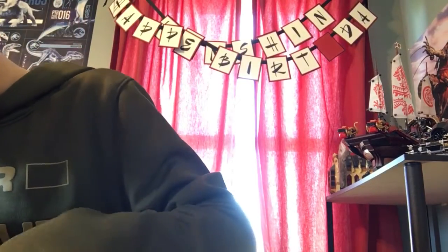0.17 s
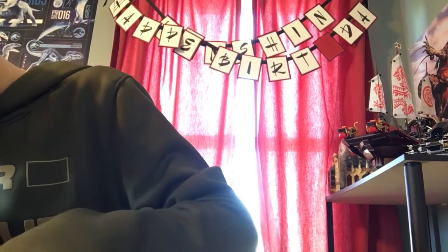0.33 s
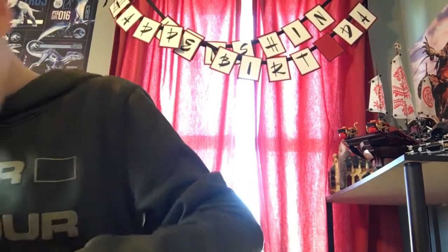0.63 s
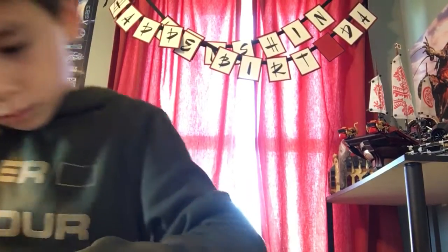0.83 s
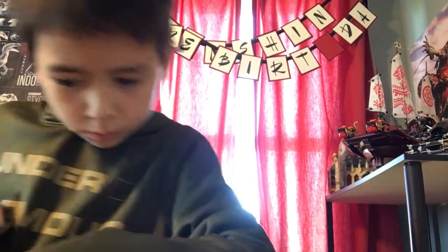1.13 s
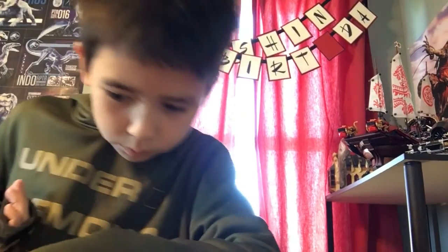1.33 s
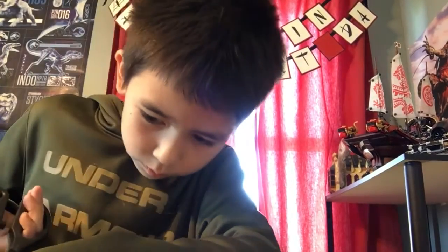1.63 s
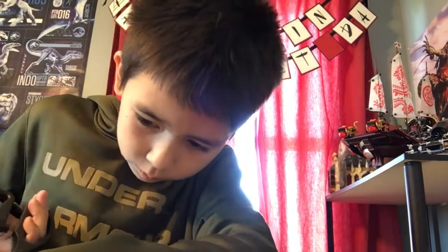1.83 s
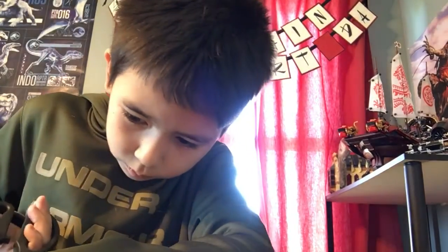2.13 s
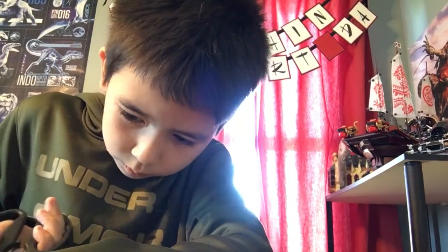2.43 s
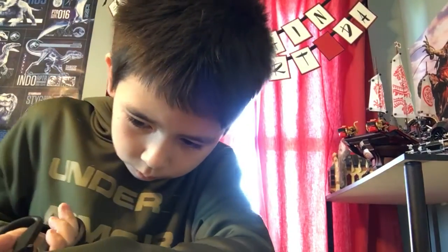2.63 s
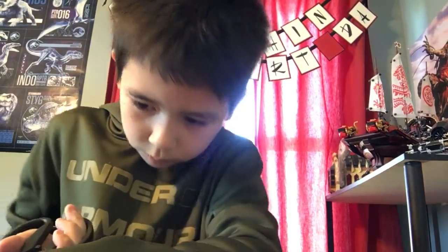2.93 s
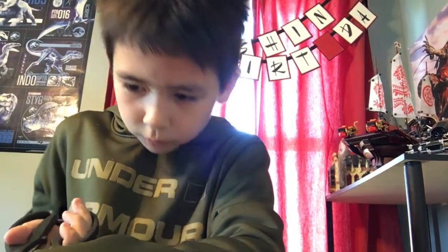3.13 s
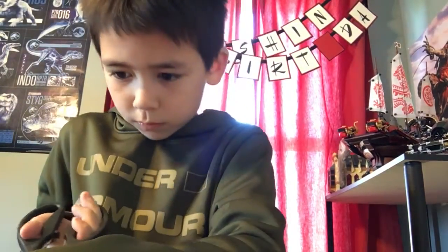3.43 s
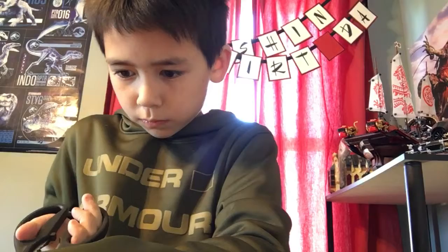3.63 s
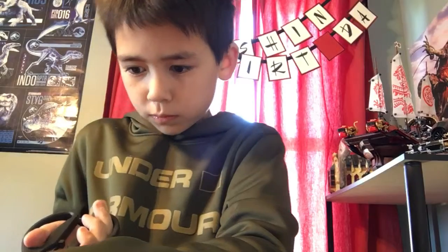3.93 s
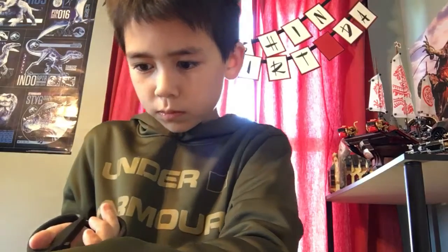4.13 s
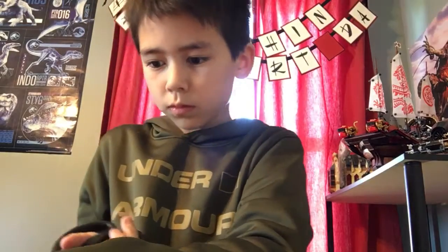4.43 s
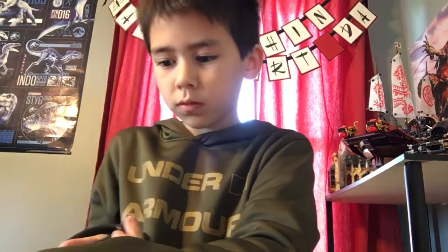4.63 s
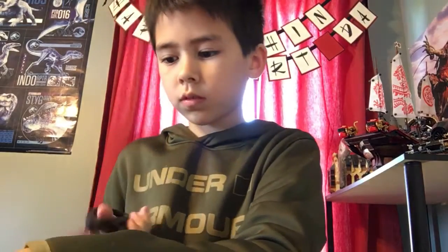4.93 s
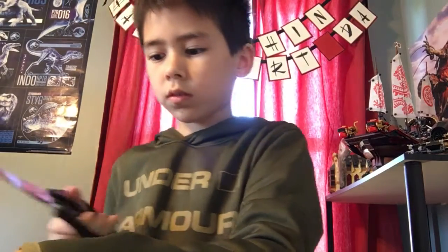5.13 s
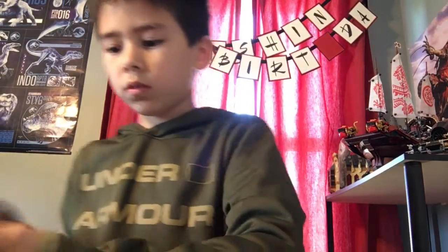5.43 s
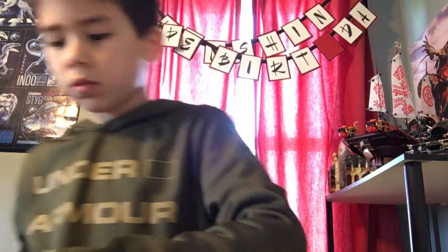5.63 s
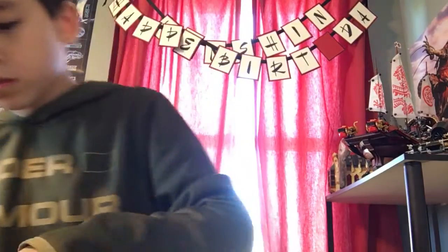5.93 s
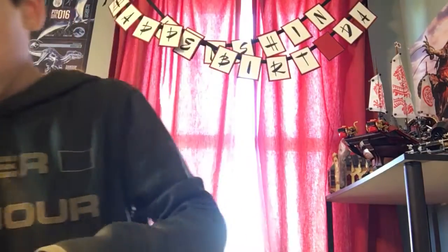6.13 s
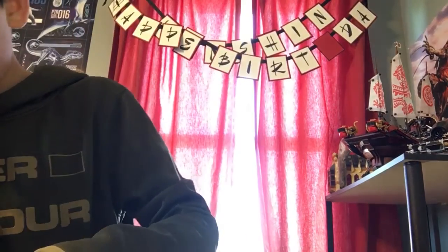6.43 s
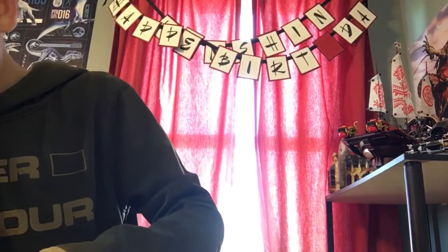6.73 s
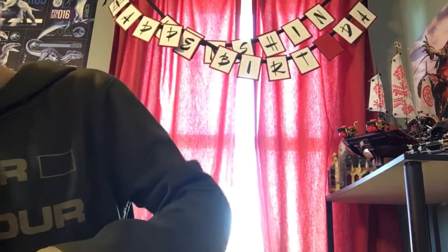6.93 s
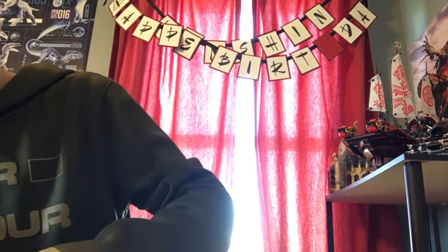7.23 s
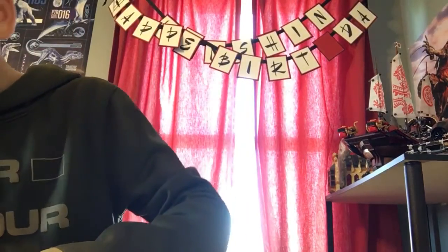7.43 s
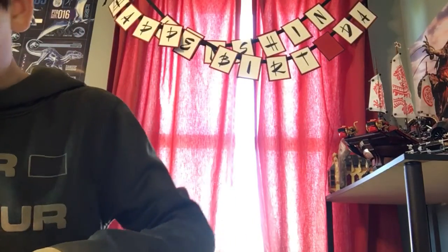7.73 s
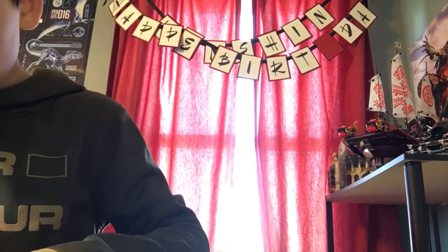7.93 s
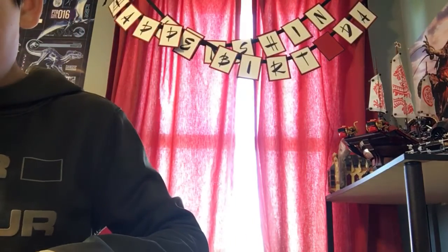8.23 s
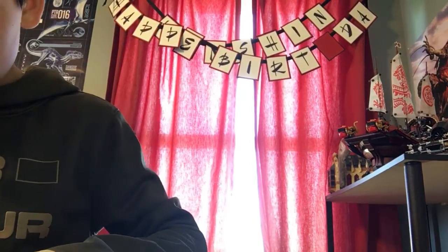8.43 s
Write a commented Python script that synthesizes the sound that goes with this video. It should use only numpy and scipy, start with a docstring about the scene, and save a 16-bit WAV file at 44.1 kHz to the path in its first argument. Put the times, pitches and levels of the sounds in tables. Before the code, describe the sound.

Close, dry plastic clicking and snipping in a quiet furnished room, broken by two loud clacks, a sharp crumple, then creaky twisting.

```python
"""Small hands cut and twist stiff plastic toy packaging on a desk, close by in a furnished room.
Over a quiet hush of shaped noise, a rustle of tiny noise grains opens; snips and clacks ring the plastic shell.
Soft desk bumps join in, and two hard clacks stand out near 2.8 and 4.6 s; after the second the shell crumples
strongly, in showers of buckles. From about 6 s twisted parts creak in stick-slip bursts, which return near
the end. The room answers snips, crumples and creaks with a brief tail of fading noise."""
import sys
import numpy as np
from scipy import signal
from scipy.fft import rfft, irfft, next_fast_len
from scipy.io import wavfile
from scipy.ndimage import uniform_filter1d, map_coordinates

SR = 44100
rng = np.random.default_rng(int(sys.argv[2]) if len(sys.argv) > 2 else 0)


def to_wav(sig):
    """Store sig (one row per channel, or 1-D mono) as 16-bit WAV at the path in sys.argv[1].

    Samples outside -1..1 are clipped; the rate is SR.
    """
    pcm = np.clip(np.atleast_2d(sig), -1, 1) * 32767
    pcm = np.round(pcm).astype(np.int16)
    wavfile.write(sys.argv[1], SR, pcm.T)  # frames by channels


N = 377937  # length in samples
LOW_HZ, HIGH_HZ = 1100, 3500  # thud lies below the first, edge and sheen above the second


def undb(db):
    """Turn decibels into a plain gain."""
    return 10 ** (np.asarray(db) / 20)


def unit(x):
    """Scale a sound to an average (RMS) level of 1."""
    return x / np.sqrt(np.mean(x ** 2))


def ring(x, hz, width_hz):
    """One damped resonance, gain 1 at its centre; a wider one dies sooner."""
    return signal.lfilter(*signal.iirpeak(hz, hz / width_hz, fs=SR), x)


def colour(x, points):
    """Shape a long sound by a spectrum given as (pitch_hz, level_db) points."""
    hz, db = np.transpose(points)
    size = next_fast_len(len(x))
    f = np.maximum(np.arange(size // 2 + 1) * SR / size, 1)
    gain = undb(np.interp(np.log(f), np.log(hz), db))
    return irfft(rfft(x, size) * gain, size)[:len(x)]


def split(x, lo_hz, hi_hz):
    """Keep only the band between two pitches."""
    return signal.sosfilt(signal.butter(2, [lo_hz, hi_hz], "band", fs=SR, output="sos"), x)


def decay(x, fade_ms):
    """Give every impulse a tail that fades exponentially."""
    return signal.lfilter([1], [1, -np.exp(-1000 / (fade_ms * SR))], x)


def walk(rate):
    """Random levels held 1 / rate s and slewed; spread near 1."""
    hold = int(SR / rate)
    steps = np.repeat(rng.standard_normal(N // hold + 1), hold)
    return unit(uniform_filter1d(steps, hold)[:N])


# Spectrum of the quiet house: pitch_hz, relative level_db (per Hz)
HUSH_SPECTRUM = [(20, -25.5), (45, -0.5), (75, -3), (170, -8), (265, -1), (420, -14.5), (800, -17.5),
                 (2500, -45), (16400, -54.5)]
HUSH_DB = -63.5


def hush():
    """The quiet of the house: shaped noise, wavering a little."""
    noise = unit(colour(rng.standard_normal(N), HUSH_SPECTRUM))
    return noise * undb(HUSH_DB + 0.34 * walk(4.6))


# How long the room holds each band: pitch_hz, t60_s (time to fall by 60 dB)
ROOM_FADES = [(260, 0.38), (600, 0.22), (1400, 0.21), (2900, 0.21), (9000, 0.26)]
ROOM_DB = -14.5


def room(x):
    """Many overlapping echoes blur into a tail of noise; each band fades at its own speed."""
    t = np.arange(SR // 2) / SR
    tail = 0
    for hz, t60_s in ROOM_FADES:
        band = split(rng.standard_normal(len(t)), hz / 1.35, hz * 1.44)
        tail = tail + band * np.exp(-np.log(1000) * t / t60_s)
    tail *= np.clip(t / 0.0055, 0, 1)  # the echoes build up over the first 5.5 ms
    return undb(ROOM_DB) * signal.fftconvolve(x, tail / np.sqrt(np.sum(tail ** 2)))[:N]


# Handling by sleeves and film: start_s, body_db, sheen_db (over 3.5 kHz)
RUSTLE_LEVELS = [(0., -47, -44), (0.042, -60, -67), (.18, -57, -72.5), (.77, -49.5, -59.5),
                 (.9, -60.5, -65), (2.5, -61.5, -80), (2.895, -53.5, -74.5), (3.2, -75, -76.5),
                 (3.601, -51, -69.5), (3.999, -74.5, -75.5), (4.521, -56, -76), (4.6, -38, -43.5),
                 (4.817, -38.5, -59), (4.95, -58.5, -77.5), (5.5, -48.5, -55.5), (5.721, -42.5, -54.5),
                 (5.8, -59, -74.5), (6.3, -45, -58.5), (6.41, -47, -63), (6.44, -57, -67.5),
                 (6.999, -50.5, -73.5), (7.2, -60, -74), (8.57, -64, -74)]
# Spectrum of rubbed cloth and film: pitch_hz, relative level_db (per Hz)
FILM_SPECTRUM = [(120, 3.5), (300, -7.5), (700, 1.5), (1500, -4), (2600, -7.5), (4000, -13.5),
                 (7000, -20.5), (16000, -32)]


def rustle(grains_per_s=600.0, spread_db=3.8, smear_ms=3.3, flicker_db=(3.0, 1.5)):
    """Cloth and film crackle in tiny grains of unequal size, each with a short tail; body and sheen flicker apart."""
    s, body_db, sheen_db = np.transpose(RUSTLE_LEVELS)
    t = np.arange(N) / SR
    sizes = undb(spread_db * rng.standard_normal(N))
    grains = (rng.random(N) < grains_per_s / SR) * sizes
    tails = decay(grains, smear_ms)
    glide = 0.5 * np.mean(tails)  # cloth sliding smoothly under the grains
    bands = [(120., HIGH_HZ, body_db), (HIGH_HZ, 17000., sheen_db)]
    out = 0
    for (lo, hi, db), flick_db in zip(bands, flicker_db):
        rubbing = (tails + glide) * rng.standard_normal(N)
        film = colour(rubbing * undb(flick_db * walk(30)), FILM_SPECTRUM)
        out = out + unit(split(film, lo, hi)) * undb(np.interp(t, s, db))
    return out


# An arm or the box bumps the desk: start_s, peak_db
DESK_BUMPS = [(1.594, -48), (3.049, -46.5), (3.465, -44), (4.612, -40.5), (5.365, -44), (5.587, -44.5),
              (6.283, -37), (6.943, -41.5), (7.287, -46.5)]
# Ways the desk rings: pitch_hz, width_hz, relative level_db
DESK_MODES = [(67, 8.8, 2.5), (138, 66, 5)]


def bumps(push_ms=11.7):
    """A soft push sets the desk's low modes going."""
    s, db = np.transpose(DESK_BUMPS)
    t = np.arange(SR // 4) / SR
    push = np.convolve(np.hanning(int(push_ms * SR / 1000)), t == 0)
    thump = sum(undb(mode_db) * ring(push, hz, width_hz) for hz, width_hz, mode_db in DESK_MODES)
    thump = split(thump, 57.0, 370.0)  # the deepest bass is cut away below the thump
    starts = np.zeros(N)
    starts[(s * SR).astype(int)] = undb(db)
    return signal.fftconvolve(starts, thump / np.abs(thump).max())[:N]


# The plastic changes shape as it is worked, so each mode comes and goes
BEND_DB, BENDS_PER_S = 3, 45


def bursts(table, modes, edge_db, uneven, scatter_db, grip_ms, swell_db_per_s):
    """Trains of uneven jerks, each a brief scrape, ring the modes; the valleys between these are dark."""
    jerks = np.zeros((3, N))  # what drives the low, middle and high modes
    for start, end, rate, db, thud_db in table:
        chance = rng.standard_normal((96, 2))
        gaps = np.exp(uneven * chance[:, 0] - uneven ** 2 / 2) / rate
        at = start + np.cumsum(gaps) - gaps[0]
        keep = at < min(end, (N - 1) / SR)
        at = at[keep]
        # the longer the push, the more it swells and eases
        arch = np.sin(np.pi * (at - start) / (end - start)) - 1
        effort_db = swell_db_per_s * (end - start) * arch
        size = undb(db + effort_db + scatter_db * chance[keep, 1]) / np.sqrt(rate / SR)
        jerks[:, (at * SR).astype(int)] += size * undb([[thud_db], [0], [edge_db]])
    jerks += 0.18 * rng.standard_normal(N) * decay(jerks, grip_ms)  # scrape after each jerk
    top_db = max(db for hz, _, db in modes if hz > HIGH_HZ)
    out = 0
    for k, (hz, width_hz, db) in enumerate(modes):
        band = int(hz > LOW_HZ) + int(hz > HIGH_HZ)
        drive = jerks[band] * undb(BEND_DB * walk(BENDS_PER_S))
        gain = undb(db - top_db * (hz > HIGH_HZ))
        # neighbouring modes swing in opposite sense, so they add up between their peaks
        out = out + (-1) ** k * gain * ring(ring(drive, hz, width_hz), hz, width_hz)
    return undb(11.5) * out  # narrow modes pass little of a jerk's energy


# Twisted parts creak: start_s, end_s, slips_per_s, relative level_db, thud_db (added under 1.1 kHz)
CREAK_BURSTS = [(6.145, 6.183, 270, -59.5, -2), (6.503, 6.62, 265, -53, -2.5),
                (6.695, 6.75, 290, -51.5, -7), (6.761, 6.806, 183, -54, -10), (6.853, 6.892, 105, -50, -10),
                (6.904, 6.938, 90, -49, -3), (7.6, 7.785, 300, -55.5, 3.5), (7.819, 7.85, 245, -54.5, 0),
                (7.865, 7.885, 218, -58, 5), (8.258, 8.278, 170, -57.5, 3.5), (8.304, 8.334, 127, -57.5, 4),
                (8.352, 8.374, 170, -57.5, 2), (8.381, 8.399, 145, -57, 1), (8.415, 8.429, 204, -56.5, 1.5),
                (8.477, 8.496, 170, -53.5, -1), (8.516, 8.568, 143, -56, 1.5)]
# Ways the twisted joint rings: pitch_hz, width_hz (of one resonance), relative level_db
JOINT_MODES = [(284, 110, -10), (596, 158, 6), (1000, 330, 8), (1710, 480, 8), (2490, 810, 2),
               (4330, 1330, -5.5), (6900, 1100, -21)]


def creaks():
    """Stick-slip at the joint: nearly even, crisp slips of like size."""
    return bursts(CREAK_BURSTS, JOINT_MODES, edge_db=-6.5, uneven=.12, scatter_db=2.0,
                  grip_ms=2.22, swell_db_per_s=48.5)


# The shell crumples: start_s, end_s, buckles_per_s, relative level_db, thud_db (added under 1.1 kHz)
CRUMPLE_BURSTS = [(0.216, 0.313, 570, -66, 17), (1.125, 1.181, 223, -60, 7.5),
                  (2.601, 2.68, 144, -57.5, 0.5), (4.571, 4.657, 326, -46, -3),
                  (4.705, 4.819, 360, -45, -1), (5.074, 5.11, 320, -59.5, 5), (5.15, 5.2, 193, -63, 5),
                  (5.375, 5.41, 194, -47, -2.5), (5.599, 5.639, 416, -44.5, -4.5),
                  (6.2, 6.25, 84, -52.5, 1.5), (6.069, 6.14, 110, -56.5, 3.5),
                  (6.65, 6.691, 220, -48.5, -28), (6.953, 7.05, 126, -56, 2), (7.358, 7.415, 170, -46, -7)]
# Ways the plastic shell rings, also when struck: pitch_hz, width_hz (of one resonance), relative level_db
SHELL_MODES = [(289.3, 166, 0), (600, 160, 6), (931, 276, 1.5), (1540, 455, 0.5), (2445, 474, 2),
               (3970, 910, -5.5), (5100, 1400, -11.5), (6600, 1630, -15.5), (12130, 2400, -29.5)]


def crumples():
    """Buckling of the shell: a shower with chance gaps and chance sizes."""
    return bursts(CRUMPLE_BURSTS, SHELL_MODES, edge_db=-12.5, uneven=0.64, scatter_db=4.5,
                  grip_ms=2.66, swell_db_per_s=21.0)


LEAN_DB_PER_OCT = 3.5  # a blow favours the modes near its pitch
PIECE_DB, PIECE_CYCLES = -19.5, 7  # the loose piece that is struck rings briefly at the blow's pitch
# Contact takes a moment to build: time at level 0 dB, and dB of lengthening per dB softer
RISE_MS, SOFTER = 0.17, 0.39
# Snips, clicks and clacks: start_s, level_db, brightness_db, pitch_hz
CLICK_BLOWS = [(0.117, -38.5, -10, 1540), (0.31, -30.5, -5, 1090), (0.504, -33, -13.5, 620),
               (0.536, -37, -3.5, 960), (0.575, -45, -4, 2430), (0.611, -48, -8, 1300),
               (0.689, -35, -17, 1000), (0.704, -30, -6.5, 1060), (0.73, -38, -8, 1000),
               (0.76, -27.5, -6, 643), (0.954, -45, -0.5, 870), (1.127, -21, -20, 2600),
               (1.412, -40, -39, 1530), (1.598, -24.5, -11, 2560), (1.614, -27.5, -20, 660),
               (1.689, -35, -16, 840), (1.724, -29, -7, 575), (1.827, -36.5, -16, 1420),
               (1.921, -35.5, -36, 1500), (1.988, -32, -18, 986), (2.069, -25.5, -13.5, 686),
               (2.275, -26, -16.5, 2300), (2.617, -32, -17, 663), (2.658, -25.5, -18.5, 2280),
               (2.742, -34, -16.5, 1280), (2.7987, -3.5, -21, 2490), (2.8004, -10.5, -17.5, 1513),
               (2.918, -38.5, -16, 480), (3.057, -33, -12.5, 1470), (3.302, -29, -16.5, 535),
               (3.362, -38, -7.5, 2560), (3.382, -39.5, -27, 510), (3.469, -19.5, -16.5, 1480),
               (3.546, -30.5, -12, 596), (3.568, -28, -15.5, 596), (3.585, -27.5, -25, 635),
               (3.6, -38, -24, 1490), (3.618, -38, -22, 1480), (3.635, -31.5, -19, 600),
               (3.669, -35, -41, 630), (3.684, -20, -17, 572), (3.697, -25, -15.5, 2660),
               (3.752, -32, -24, 613), (3.787, -38, -19, 888), (3.808, -28, -23, 610),
               (3.861, -26.5, -20.5, 865), (3.89, -30.5, -25, 570), (3.922, -32.5, -11.5, 1090),
               (4.035, -42, -38.5, 514), (4.092, -47.5, -41, 600), (4.165, -31, -42, 600),
               (4.219, -44.5, -40.5, 806), (4.26, -62, 6.5, 1500), (4.372, -22, -1.5, 2290),
               (4.397, -28, -27, 1700), (4.54, -35.5, -3.5, 960), (4.5588, -1, -12.5, 1590),
               (4.5621, -6.5, -7, 496), (4.601, -17, -14, 1270), (4.621, -21.5, -16, 2460),
               (4.631, -16.5, -7.5, 2480), (4.6366, -17, -16, 2440), (4.736, -20.5, -7.5, 890),
               (4.77, -24.5, -12, 2440), (4.799, -21, -8.5, 960), (5.075, -34, -22, 1510),
               (5.176, -30.5, -22, 2630), (5.272, -19.5, -13.5, 905), (5.304, -27.5, -17, 630),
               (5.367, -21, -13, 1010), (5.383, -20, -10, 2570), (5.414, -39, -25, 740),
               (5.548, -36.5, -1.5, 1280), (5.594, -22, -11.5, 660), (5.696, -32.5, -11.5, 690),
               (5.725, -26, -17, 1710), (5.848, -33.5, -27, 1890), (5.908, -29.5, -15.5, 900),
               (5.955, -26.5, -13, 890), (5.97, -31, -11, 1550), (6.06, -26, -16.5, 846),
               (6.231, -34.5, -5, 850), (6.254, -13, -12, 890), (6.272, -27, -9.5, 2300),
               (6.602, -30, -14, 2290), (6.6477, -15.5, -18.5, 1000), (6.665, -24.5, -16.5, 1000),
               (6.781, -25.5, -21, 650), (6.812, -33.5, -17, 1800), (6.839, -34, -27, 1870),
               (6.942, -14, -14, 1710), (6.949, -17.5, -33, 261), (7.298, -26, -12.5, 1630),
               (7.33, -27.5, -14.5, 1590), (7.355, -19.5, -10.5, 930), (7.467, -33, -17, 1780),
               (7.522, -32.5, -10.5, 1660), (7.901, -36.5, -19, 1800), (7.942, -35.5, -26, 1180),
               (7.982, -34, -31, 1100), (8.016, -35.5, -21, 1040), (8.038, -36, -36, 1070),
               (8.07, -14.5, -17.5, 764), (8.152, -36.5, -27, 1040), (8.18, -37, -25, 1000),
               (8.24, -29, -32, 1090), (8.469, -33.5, -16, 1270)]
# Thud, body, snap and edge of a blow: level_db (added to the blow's), gain in dB per dB of brightness
BLOW_PARTS = [(-7, 0.07), (-2, 0.0843), (2, 0.22), (5.5, 1.32)]
# Borders of those four parts: pitch_hz
PART_EDGES_HZ = (230, 700, 1700, 3500, 18000)
# How long those four parts last: fade_ms
PART_FADE_MS = (18, 10.4, 5, 3.3)


def clicks(scatter_db=3.0, rattle=0.29, blow_ms=4.9, harder=0.45, flex=0.048):
    """Each blow, a hard tick plus a short rattle of contact, shares among the shell's modes by where it lands."""
    s, db, bright_db, pitch_hz = np.transpose(CLICK_BLOWS)
    t = np.arange(2048) / SR

    def lean_db(hz):
        """Weaken what lies far from the blow's pitch."""
        return -LEAN_DB_PER_OCT * np.abs(np.log2(np.clip(hz, 500, 2500) / pitch_hz))

    fade_ms = (blow_ms * undb(-harder * db))[:, None]  # a harder blow is a shorter one
    blow = rattle * rng.standard_normal((len(s), len(t))) * np.exp(-1000 * t / fade_ms)
    blow[:, 0] += 1.6  # the hard tick
    shell = 0
    for k, (hz, width_hz, mode_db) in enumerate(SHELL_MODES):
        share_db = mode_db + lean_db(hz) + scatter_db * rng.standard_normal(len(s))
        shell = shell + (-1) ** k * undb(share_db)[:, None] * ring(blow, hz, width_hz)
    # the grip flexes the shell, so all its modes shift a little from blow to blow
    read = np.arange(len(t)) * np.exp(flex * rng.standard_normal((len(s), 1)))
    shell = map_coordinates(shell, [np.arange(len(s))[:, None] + 0 * read, read])
    turns = pitch_hz[:, None] * t
    shell += undb(PIECE_DB) * np.sin(2 * np.pi * turns) * np.exp(-turns / PIECE_CYCLES)
    rise = 1 - np.exp(-1000 * t / (RISE_MS * undb(-SOFTER * db))[:, None])
    sound = 0
    for lo, hi, (rel_db, slope), ms in zip(PART_EDGES_HZ, PART_EDGES_HZ[1:], BLOW_PARTS, PART_FADE_MS):
        part = split(split(shell, lo, hi), lo, hi) * np.exp(-1000 * t / ms) * rise
        part_lean_db = lean_db(np.sqrt(lo * hi)) * (lo < HIGH_HZ)  # the edge does not lean
        part_db = db + rel_db + slope * bright_db + part_lean_db
        sound = sound + part * (undb(part_db) / np.abs(part).max(axis=1))[:, None]
    out = np.zeros(N + len(t))
    for at, row in zip((s * SR).astype(int), sound):
        out[at:at + len(t)] += row
    return out[:N]


def scene():
    """Add the plastic sounds, the room's answer to them, and the softer layers."""
    near = clicks() + creaks() + crumples()
    return (near + room(near) + bumps() + rustle() + hush())[None]


def record(dry):
    """Peaks near full scale are rounded and the top is cut steeply."""
    rounded = dry / (1 + dry ** 4) ** .25
    top_cut = signal.ellip(10, .2, 60, 16300, fs=SR, output="sos")  # cut above 16300 Hz
    return signal.sosfilt(top_cut, rounded)


dry = scene()
out = record(dry)
to_wav(out)
```